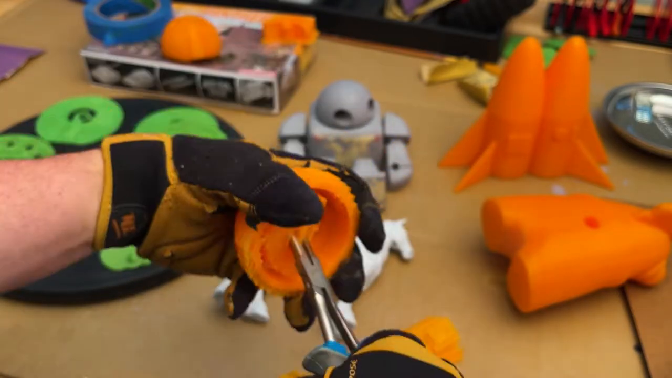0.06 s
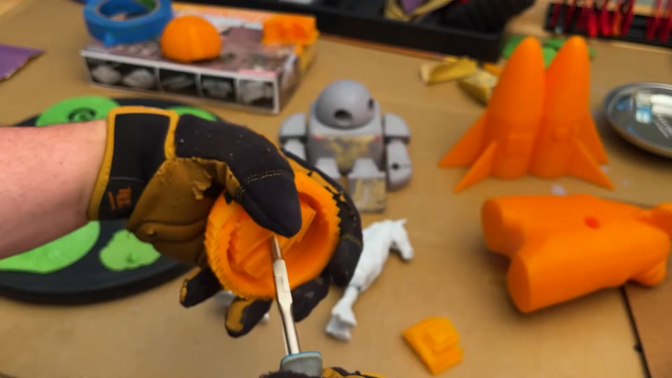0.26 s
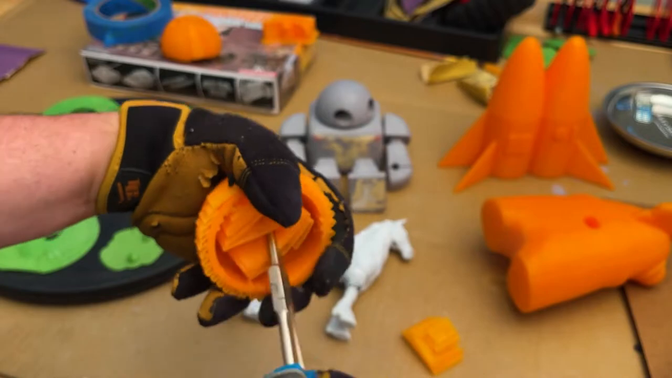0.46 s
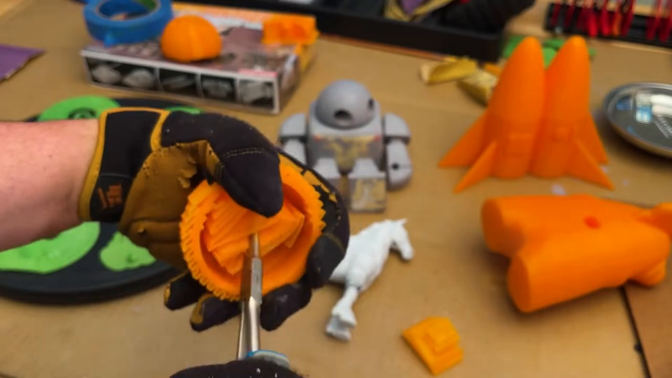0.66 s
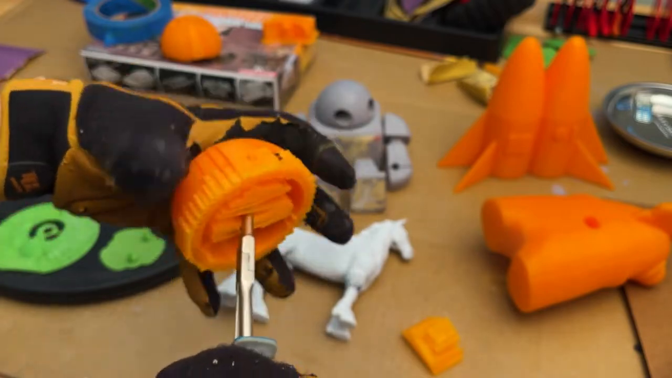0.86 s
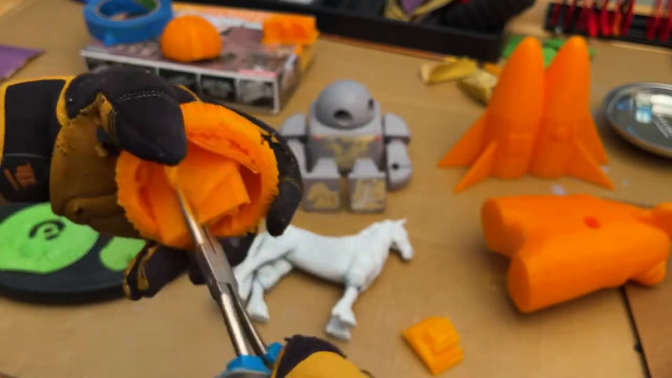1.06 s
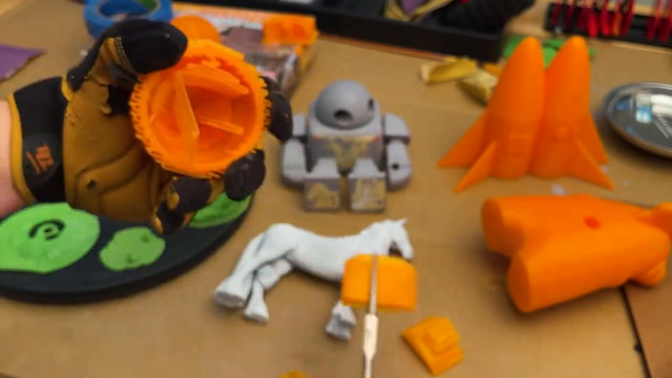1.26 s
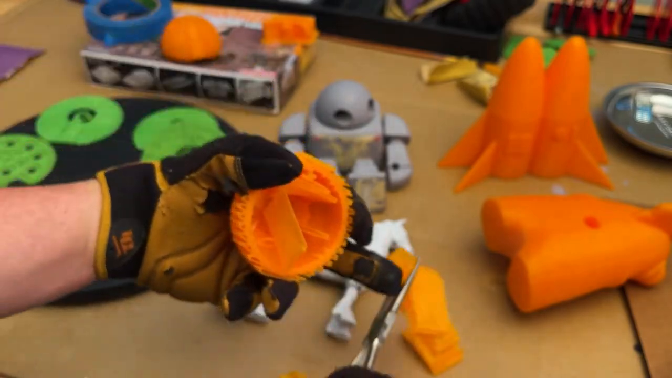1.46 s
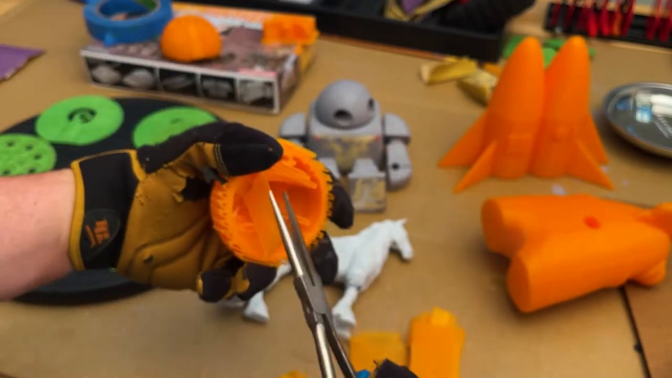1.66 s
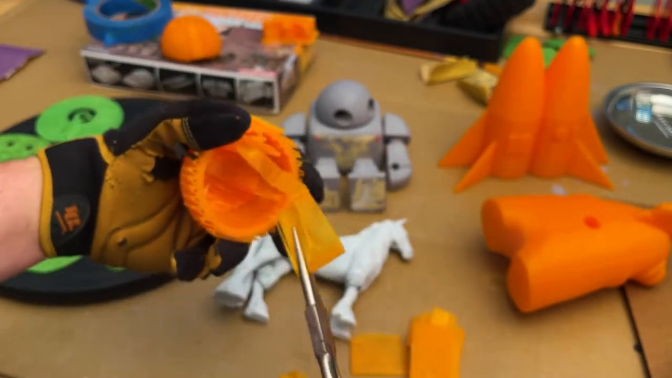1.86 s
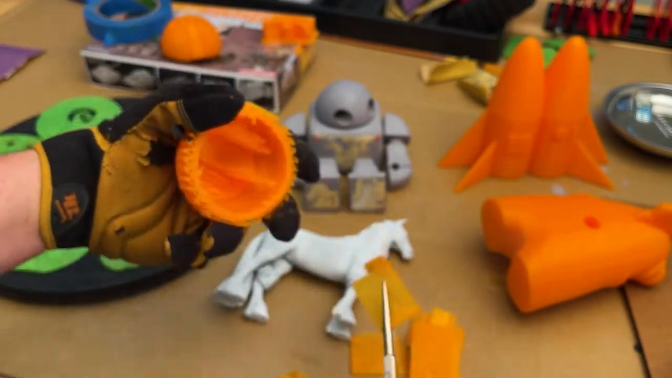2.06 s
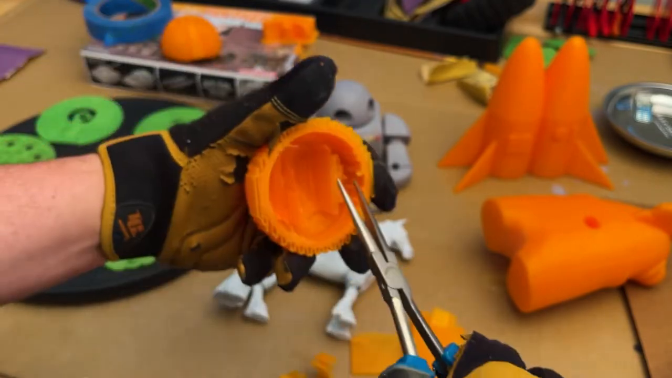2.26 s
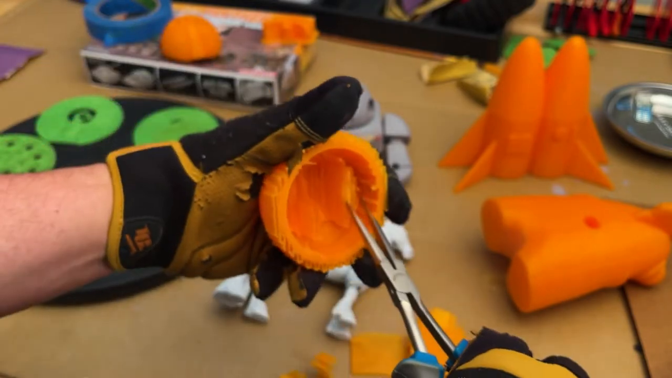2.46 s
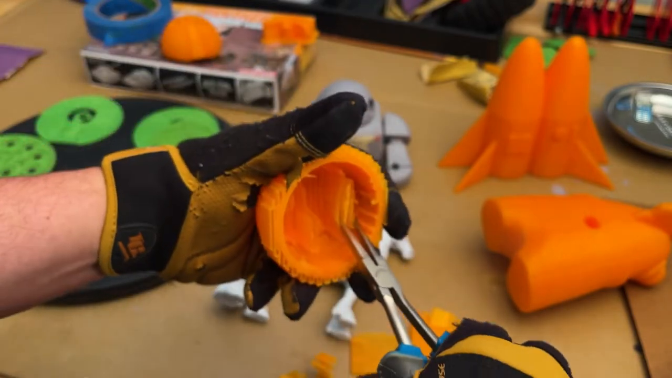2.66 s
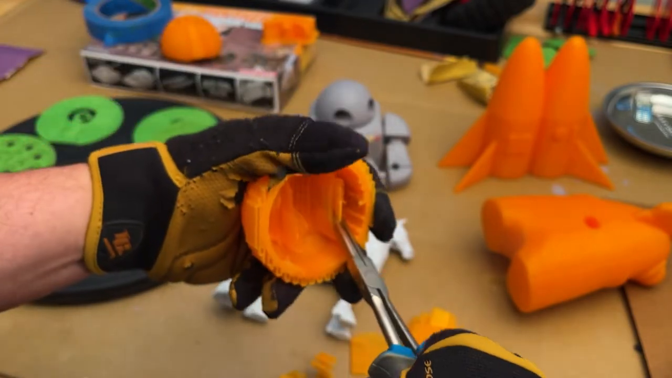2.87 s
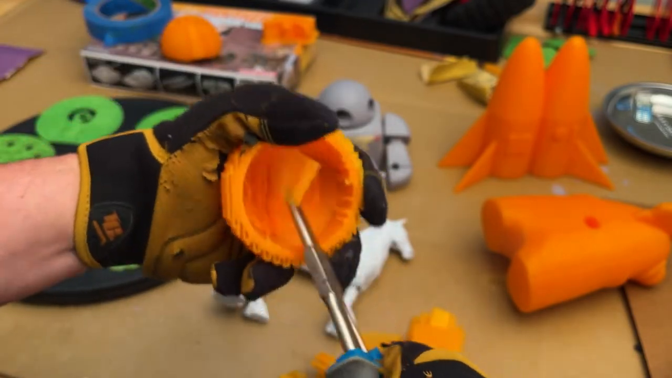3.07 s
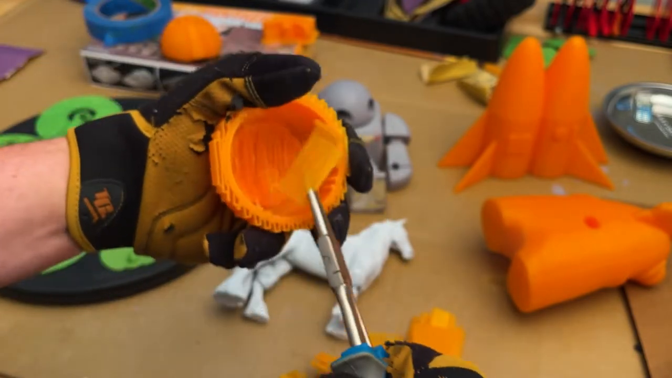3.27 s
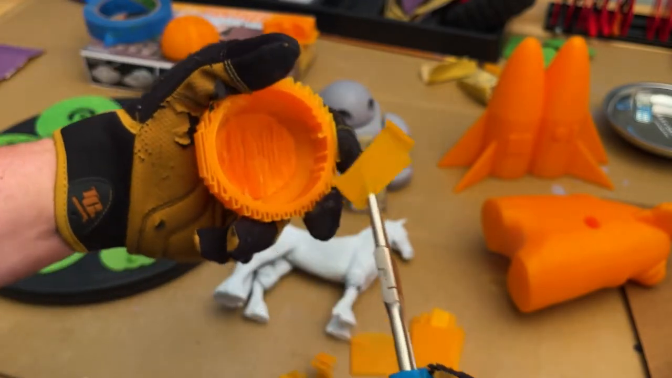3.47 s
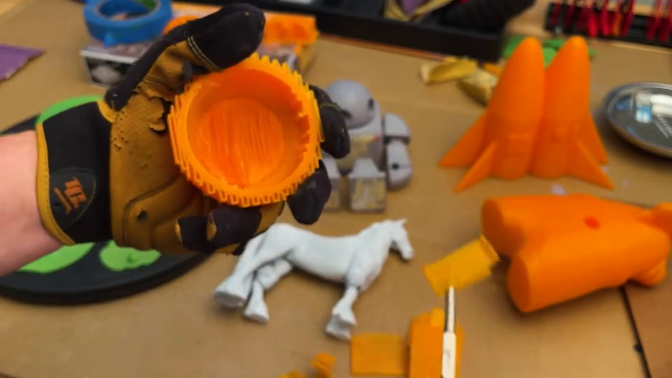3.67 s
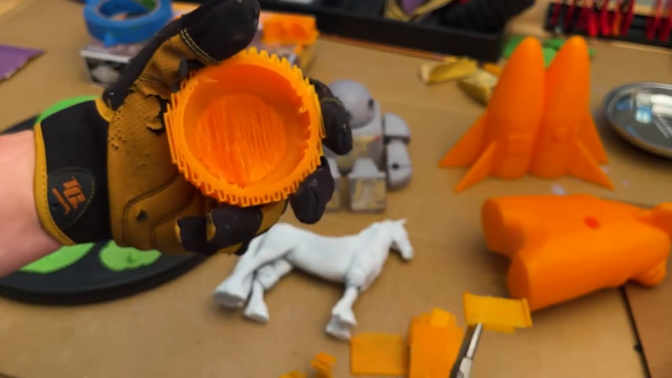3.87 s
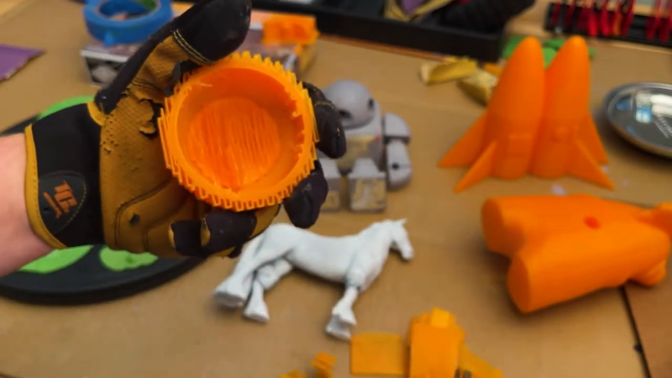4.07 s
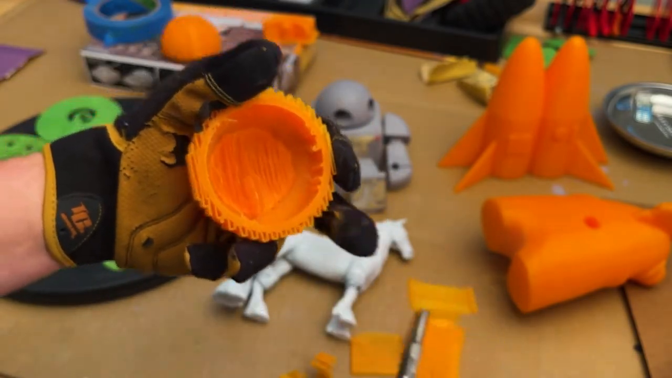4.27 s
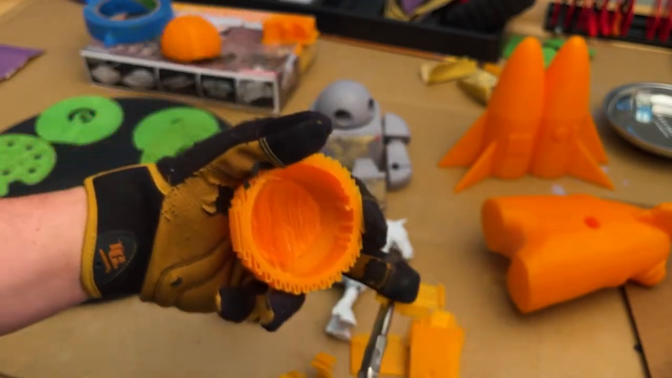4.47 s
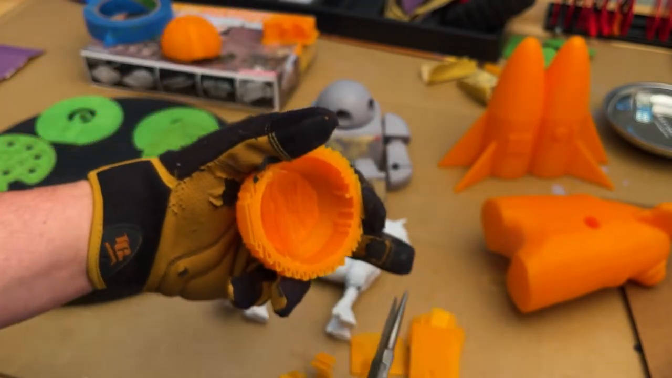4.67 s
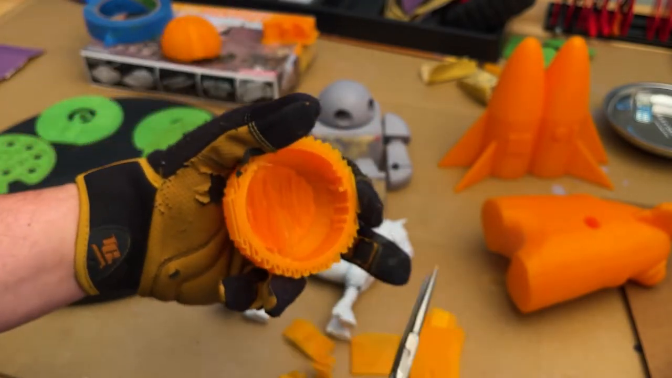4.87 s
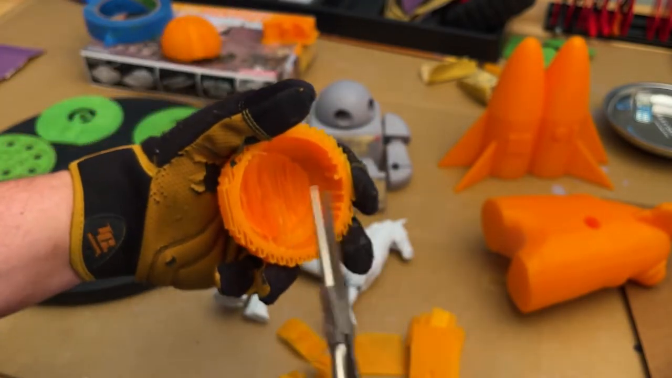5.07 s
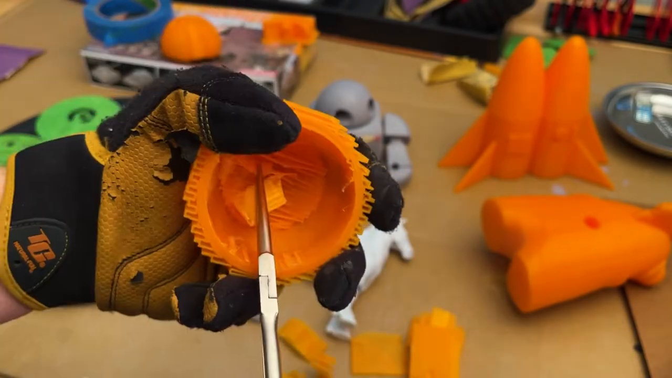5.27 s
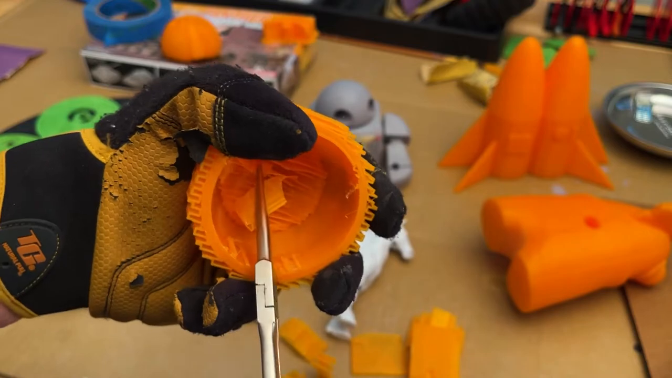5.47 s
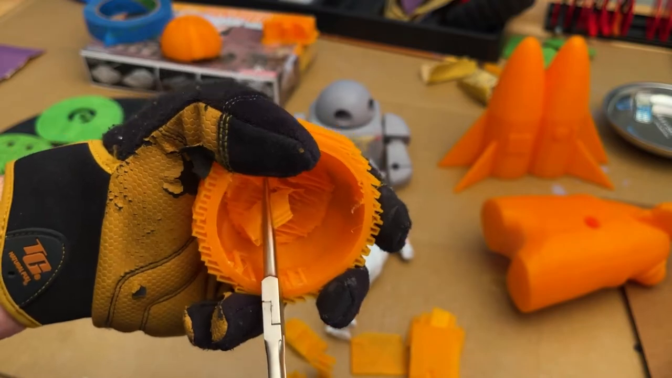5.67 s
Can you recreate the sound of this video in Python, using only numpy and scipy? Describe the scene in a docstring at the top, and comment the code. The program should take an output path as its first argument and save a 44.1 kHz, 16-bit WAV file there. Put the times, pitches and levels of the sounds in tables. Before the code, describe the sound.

A close stereo microphone in a small room catches plastic support being ripped out of a hollow printed cup with tweezers. From 0 to 1.1 s, a sped-up flurry of very short, bright, hissy snaps and tiny zipping crackles comes mostly from the left, with soft low thuds, strongest near 1.06 s; the low room noise drops away. It goes almost silent, then a scrap patters very faintly on the table around 1.5-1.7 s, and sharp ticks return at 1.8-1.95 s. At about 2.3-2.4 s soft room noise comes up and the sound turns duller, more central, ringing longer. Cracks at 2.55 and 2.72 s lead to the loudest tearing burst at 3.0-3.2 s, with a short squeaky scrape. After near-quiet, a lone click falls at 4.3 s, then lower creaking crackles at 4.7-5.1 s, a faint scrape around 5.3-5.5 s and weak final ticks.

```python
"""Plastic support lattice is torn out of a printed cup with long tweezers, close to a stereo microphone, in a small room.
Strands snap one by one as short filtered noise bursts and crackle in runs of tiny random breaks; a few send a falling thud.
Before the turn the snaps sound sped-up, bright and short; after it they are duller and ring longer. A torn-off
scrap rattles onto the table as fluttering modes. Scrapes sing in gliding sines; faint low tones and room noise
lie beneath, and the room noise drops out at times before the turn."""
import sys
import numpy as np
from scipy import signal
from scipy.fft import rfft, irfft, next_fast_len
from scipy.io import wavfile
from scipy.ndimage import uniform_filter1d, map_coordinates

SR = 44100
rng = np.random.default_rng(int(sys.argv[2]) if len(sys.argv) > 2 else 0)


def materialize(psi):
    """Save the field psi as 16-bit PCM at rate SR to the path in sys.argv[1].

    A 1-D psi becomes a single channel; in a 2-D psi each row is a channel.
    """
    bounded = np.clip(np.atleast_2d(psi).T, -1, 1)
    quanta = np.round(bounded * 32767).astype(np.int16)
    wavfile.write(sys.argv[1], SR, quanta)


N = 252625

TURN_S = 2.33  # sped-up, bright, short snaps before; duller snaps that ring longer after
AFTER_TURN = np.arange(N) >= TURN_S * SR


def snaps():
    """Each break is a burst that rises at once and dies within milliseconds; a duller rustle follows it."""
    # Strands that snap on their own, and near 1.53 to 1.64 s the sharp hits of the torn-off scrap # bouncing on
    # the table. Each row: start in seconds, relative level in dB, # low part over high part in dB, ringing in
    # Hz.
    single_breaks = [(0.0147, -38.5, -13, 9640), (0.0412, -22.5, -23, 9150), (0.0462, -29.5, -15, 7500),
                     (0.0768, -41.5, -32, 9500), (0.0911, -23, -9, 10430), (0.0983, -15, -14, 7490),
                     (0.1646, -18, -18.5, 5320), (0.1882, -30.5, -21.5, 4970), (0.2488, -13.5, -13.5, 9530),
                     (0.2543, -24.5, -22, 9350), (0.3033, -22.5, -19, 13700), (0.3221, -17.5, -13.5, 1030),
                     (0.3456, -33, -25.5, 13100), (0.3619, -27, -18.5, 5080), (0.4106, -25, -13, 11120),
                     (0.4157, -32.5, -15, 13600), (0.424, -25.5, -13.5, 10750),
                     (0.4303, -22.5, -32.5, 9500), (0.4646, -14.5, -19, 11600), (0.4701, -21.5, -6, 11150),
                     (0.475, -24.5, -44.5, 7500), (0.521, -27.5, -14.5, 11000), (0.5765, -40, -26, 12900),
                     (0.5859, -34, -12, 7560), (0.6088, -17, -20.5, 11170), (0.6441, -20.5, -22, 11650),
                     (0.664, -33.5, -23.5, 11740), (0.6726, -36, -15.5, 5580), (0.7378, -32.5, -10, 8130),
                     (0.7922, -24.5, -19, 14200), (0.9353, -24.5, -31.5, 10460), (0.9435, -23.5, -15, 3560),
                     (0.9892, -26, -15.5, 14460), (1.0049, -23, -16.5, 11880), (1.0238, -25, -22, 15070),
                     (1.0318, -17.5, -19.5, 7570), (1.0581, -15, -9, 13070), (1.078, -32, -8.5, 1033),
                     (1.2767, -41.5, -22, 13400), (1.453, -61, -22, 7800), (1.532, -44.5, 0, 3350),
                     (1.592, -50, -6, 6500), (1.612, -56, -28, 10000), (1.637, -42.5, -27, 3400),
                     (1.6637, -44, -18, 8311), (1.693, -57, -28, 8000), (1.7438, -46, -37, 10100),
                     (1.7968, -28, -19, 11283), (1.8007, -20.5, -12, 13800), (1.8075, -24.5, -10, 11360),
                     (1.8193, -29.5, -18, 11300), (1.838, -25, -16, 13600), (1.9282, -29, -34, 10895),
                     (1.9493, -23, -6, 14800), (2.048, -38.5, -15, 12700), (2.174, -38.5, -27, 13700),
                     (2.232, -43.5, -16.5, 8600), (2.3975, -44.5, 6.5, 2411), (2.453, -49.5, 16, 1030),
                     (2.545, -24, -7.5, 9560), (2.5658, -31, -6, 7960), (2.5732, -32, -1.5, 5900),
                     (2.6768, -39, 5, 1042), (2.7166, -11.5, -8, 3789), (2.758, -27.5, -2.5, 4993),
                     (2.8431, -28.5, -9, 6880), (2.8525, -35.5, -6, 4850), (2.879, -41, -4.5, 8527),
                     (2.929, -26, -3.5, 3852), (3.0096, -10.5, 2.8, 8460), (3.0276, -15, -2.5, 3408),
                     (3.0318, -13.5, -1, 8560), (3.0545, -8, -1.5, 3254), (3.0612, -17.5, -0.5, 3229),
                     (3.0658, -15.5, -10, 3049), (3.0701, -12, -2.5, 8700), (3.0745, -18.5, 7, 3805),
                     (3.085, -23.5, 4.5, 3100), (3.1082, -23, -7.5, 7037), (3.1118, -31.5, 10, 3656),
                     (3.1533, -9, -7.5, 3913), (3.157, -11, 4, 3820), (3.5315, -51.5, -3, 2730),
                     (3.6174, -50, 2, 6660), (4.315, -26.5, -8, 7220), (4.5787, -41, 0, 6600),
                     (4.6938, -25.5, 0, 2450), (4.6975, -38.5, 6, 6700), (4.7425, -41, -0.5, 5080),
                     (4.7775, -33.5, 3, 2770), (4.785, -40, 10, 2900), (4.8092, -28, 8, 4000),
                     (4.8608, -21.5, 10.5, 4000), (4.8748, -37.5, 14.5, 4430), (4.882, -32, 8, 3200),
                     (4.891, -31, 12, 4200), (4.9043, -34, -1, 5700), (4.918, -37.5, 12, 3900),
                     (4.9437, -37.5, 15, 4280), (5.347, -47, -10, 3840), (5.5111, -50.5, 3, 5900),
                     (5.543, -36, -14.5, 5360), (5.572, -53, -3, 2760), (5.6753, -41, -2, 7400)]
    early_t60_s, late_t60_s = 0.005, 0.011  # before and after the turn
    crack_db = 10  # the first instant of a break over its level
    levels = np.zeros((2, N + SR))
    cracks = np.zeros((2, N))
    ring_hz = np.ones(N)
    t = np.arange(SR // 8) / SR
    rise = 1 - np.exp(-t / .0004)
    for s, db, low_db, hz in sorted(list(single_breaks) + ripped()):
        start = round(s * SR)
        t60_s = early_t60_s if s < TURN_S else late_t60_s
        burst = parts(low_db) * amp(db + 3.0 - 60 * t / t60_s)
        rustle = parts(low_db + 8.5) * amp(db - 24.0 - 60 * t / 0.1)  # duller than the break
        levels[:, start:][:, :len(t)] += (burst + rustle) * rise
        cracks[:, start + 8] += parts(low_db)[:, 0] * amp(db + crack_db)
        ring_hz[start:] = hz
    return ringing(plastic(levels[:, :N], cracks), ring_hz, lift_db=10.5)


def ripped():
    """Rows of strands let go one after another: near-even gaps and a random colour for each break."""
    # Each row: first break in seconds, last break in seconds, gap in seconds, relative level in dB,
    # low part over high part in dB, ringing in Hz.
    strand_rows = [(0.436, 0.4494, 0.0023, -28.5, -19, 10210), (0.6135, 0.63, 0.0023, -24.5, -23.5, 14000),
                   (0.7092, 0.721, 0.0037, -23.5, -22, 15080), (0.7487, 0.7493, 0.003, -33.5, -18.5, 10490),
                   (2.718, 2.742, 0.0073, -24.5, -13, 4852)]
    gap_scatter, colour_scatter_db = 0.063, 2.5  # the first as a share of the gap
    breaks = []
    for first, last, gap, db, low_db, hz in strand_rows:
        for s in np.arange(first, last + gap / 2, gap):
            shift_s = gap_scatter * gap * rng.standard_normal()
            colour_db = colour_scatter_db * rng.standard_normal()
            breaks.append((s + shift_s, db, low_db + colour_db, hz))
    return breaks


def crackle():
    """Tiny breaks at random moments and of random strength, over a rubbing hiss; the scrapes have the hiss alone."""
    # Runs of fine tearing and rubbing. Each row: start in seconds, end in seconds, first relative level in dB,
    # last relative level in dB, low part over high part in dB, ringing in Hz.
    tearing_runs = [(0, 0.09, -59.5, -63, 1, 4300), (0.634, 0.678, -26.5, -51.5, -10.5, 12100),
                    (0.714, 0.76, -44, -48, -6, 14200), (0.928, 0.96, -45.5, -46, -11.5, 13250),
                    (1.248, 1.327, -71.5, -59.5, -46, 14040), (1.462, 1.549, -54, -51, -22.5, 12320),
                    (1.545, 1.736, -55, -68, -16, 13200), (1.746, 1.803, -54.5, -60.5, -11, 14200),
                    (1.923, 1.991, -31.5, -43.5, -11, 11600), (1.996, 2.147, -54, -62.5, -10.5, 11400),
                    (2.173, 2.219, -44.5, -80, -12.5, 11900), (2.434, 2.518, -63, -59.5, 15.5, 998),
                    (2.505, 2.578, -47, -34, 5.5, 5300), (2.678, 2.707, -49, -45.5, 10, 1940),
                    (2.73, 2.793, -36.5, -40, -6.5, 5160), (2.901, 2.94, -44, -38, -2.5, 8570),
                    (2.993, 3.009, -47.5, -37.5, -5, 8390), (3.012, 3.052, -24, -26, 6.5, 3490),
                    (3.062, 3.097, -28.5, -28.5, 4, 3490), (3.15, 3.205, -16, -46.5, 1.5, 3750),
                    (3.534, 3.75, -67.5, -67, -2.5, 4960), (4.876, 4.973, -39, -49.5, 11.5, 4100),
                    (4.973, 5.133, -55, -73, 13, 2750)]
    # Smooth scrapes of the jaws. Each row: start in seconds, end in seconds, first relative level in dB,
    # last relative level in dB, low part over high part in dB, ringing in Hz.
    jaw_scrapes = [(1.076, 1.167, -33.5, -60.5, -11.5, 14130), (3.1, 3.152, -25, -24, -6, 5750),
                   (4.501, 4.539, -59.5, -45.5, 5, 3130), (4.536, 4.614, -48, -54, 0, 4300),
                   (4.695, 4.857, -46, -51.5, 7, 2400), (5.285, 5.503, -57.5, -72, 6.5, 5760),
                   (5.693, 5.727, -40, -55, 5, 1195)]
    breaks_per_s, rub = 550, 0.31  # rub: steady hiss under the tiny breaks
    spikes = (rng.random(N) < breaks_per_s / SR) * amp(rng.normal(0, 3.5, N))
    # the tiny breaks die faster before the turn (t60 in seconds)
    short, long = (unit(signal.lfilter([1], [1, -amp(-60 / (t60 * SR))], spikes)) for t60 in (.004, .009))
    grains = np.where(AFTER_TURN, long, short) + rub
    levels, ring_hz = np.zeros((2, 2, N)), np.ones(N)
    for smooth, rows in enumerate((tearing_runs, jaw_scrapes)):
        for start, end, first_db, last_db, low_db, hz in rows:
            a, b = round(start * SR), round(end * SR)
            levels[smooth, :, a:b] += parts(low_db) * amp(np.linspace(first_db, last_db, b - a))
            ring_hz[a:b + SR // 50] = hz
    tearing, rubbing = uniform_filter1d(levels, size=260, axis=2)  # soft edges
    return amp(-3.5) * ringing(plastic(tearing * unit(grains) + rubbing), ring_hz, lift_db=6.5)


def plastic(levels, cracks=0):
    """Noise under a low and a high envelope plus single cracks takes the plastic's colour; two ports, mostly alike."""
    # Bright colour of a break before the turn. Each row: frequency in Hz, relative gain in dB.
    early_colour = [(350, -48.5), (800, -27.5), (2750, -21.5), (4160, -18.5), (7590, -9.5), (10000, -6.5),
                    (13500, -3.5), (15800, 0.5), (16100, -18.5)]
    split_hz = 6200  # between the low and the high part
    early_gain = lambda hz: amp(along(early_colour, hz))
    noise = unit(rng.standard_normal(N) + .3 * rng.standard_normal((2, N)))
    out = np.zeros((2, N))
    for gain, on in ((early_gain, ~AFTER_TURN), (cup_gain, AFTER_TURN)):
        for side, level, crack in zip((1, -1), levels, np.broadcast_to(cracks, levels.shape)):
            # side 1 keeps the lows, side -1 the highs
            half = lambda hz: causal(gain(hz) / np.sqrt(1 + ((hz + 1) / split_hz) ** (16 * side)))
            out += filtered((noise * level + crack) * on, half)
    return out


def cup_gain(hz):
    """The cup colours a break, and resonances of its wall stand out on top."""
    # Colour of a break after the turn. Each row: frequency in Hz, relative gain in dB.
    cup_colour = [(150, -45), (320, -26.5), (800, -26), (1500, -19.5), (2650, -16.5), (3100, -11),
                  (4700, -8), (7000, -8), (8600, -2), (10200, -8), (11200, -2), (12400, -17),
                  (13600, -48.5)]
    # Resonances of the cup wall. Each row: frequency in Hz, width in Hz, lift in dB.
    wall_modes = [(1587, 15, 11), (3240, 380, 5), (3670, 430, 3.5)]
    modes = sum((amp(db) - 1) / (1 + (2 * (hz - c) / w) ** 2) for c, w, db in wall_modes)
    return amp(along(cup_colour, hz)) * (1 + modes)


def parts(low_db):
    """Shares of the low and the high part, energy 1 together."""
    return np.array([[amp(low_db)], [1]]) / np.hypot(amp(low_db), 1)


def ringing(x, ring_hz, lift_db):
    """The piece in the jaws rings along: a resonance whose pitch is given per sample."""
    hz, t, z = signal.stft(x, SR, nperseg=128)
    centre = ring_hz[np.minimum(t * SR + 64, N - 1).astype(int)]
    half_width = 0.045 * centre
    ring = 1 + amp(lift_db) / (1 + ((hz[:, None] - centre) / half_width) ** 2)
    return signal.istft(z * ring, SR, nperseg=128)[1][:, :N]


def shifting(x, depth_db):
    """The colour of the noise drifts at random."""
    z = signal.stft(x, nperseg=128)[2]
    field = rng.standard_normal(z.shape[1:])
    field = uniform_filter1d(field, size=3, axis=0)  # across frequency
    field = uniform_filter1d(field, size=9, axis=1)  # across time
    return signal.istft(z * amp(depth_db * unit(field)), nperseg=128)[1][:, :N]


def scrap():
    """Every bounce on the table rings the scrap's modes anew; each ring flutters at random."""
    # Bounces of the torn-off scrap. Each row: start in seconds, relative level in dB.
    bounces = [(1.503, -63), (1.532, -51), (1.571, -57), (1.596, -60), (1.639, -58)]
    # Modes of the scrap. Each row: frequency in Hz, relative level in dB, t60 in seconds.
    scrap_modes = [(1140, -16, 0.13), (1706, -11, 0.084), (3100, -8, 0.039), (3560, -11, 0.089),
                   (4820, -8.5, 0.039), (5900, -6.5, .025)]
    out, t = np.zeros(N), np.arange(SR // 8) / SR
    rise = 1 - np.exp(-t / .001)
    for s, db in bounces:
        for hz, level, t60 in scrap_modes:
            flutter = 1 + 1.3 * wobble(len(t), size=90)
            fade = amp(db + level + rng.normal(0, 3) - 60 * t / t60) * rise
            out[round(s * SR):][:len(t)] += fade * flutter * np.sin(2 * np.pi * hz * t)
    return out


def thuds():
    """One push each, spread out so that the highs arrive first and the lows trail by about 1.5 cycles."""
    # Thuds under some breaks. Each row: start in seconds, relative level in dB, upper corner in Hz.
    pushes = [(0.093, -49.5, 1230), (0.248, -39, 1380), (0.322, -33, 1110), (0.468, -48, 1690),
              (0.4739, -48, 1180), (1.0589, -32, 1980), (1.062, -24, 1260), (1.0763, -20.5, 983),
              (2.397, -56.5, 1440), (2.569, -44, 813), (3.011, -41.5, 1170), (3.068, -38, 662),
              (4.3151, -60.5, 1497), (4.695, -50, 1200)]
    click = np.arange(N) == 0
    out = np.zeros(N)
    for s, db, top_hz in pushes:
        shape = lambda hz: 1 / (1 + (170 / (hz + 1)) ** 4) / (1 + (hz / top_hz) ** 4)
        glide = lambda hz: np.exp(-2j * np.pi * (1.5 * np.log(1 + hz / 40) + hz * s))  # also moves it to s
        out += amp(db + 38.5) * filtered(click, lambda hz: shape(hz) * glide(hz))
    return out


def tones(rows, flutter, size):
    """Sines that glide a little, flutter, and fade in and out."""
    out = np.zeros(N)
    for start, end, first_hz, last_hz, db in rows:
        a, b = round(start * SR), round(end * SR)
        fade = signal.windows.tukey(b - a, .5)
        swell = amp(db) * fade * (1 + flutter * wobble(SR, size)[:b - a])
        out[a:b] += swell * np.sin(2 * np.pi * np.cumsum(np.linspace(first_hz, last_hz, b - a)) / SR)
    return out


def right_port(x):
    """A little farther from the work; after the turn farther still, and weaker around the cup's main ring."""
    lag = lambda hz, s: np.exp(-2j * np.pi * hz * s)
    shade = lambda hz: amp(-5.5 / (1 + ((hz - 3600) / 1900) ** 2))
    early = filtered(x * ~AFTER_TURN, lambda hz: lag(hz, 1.1e-5))
    late = filtered(x * AFTER_TURN, lambda hz: lag(hz, 2.6e-5) * shade(hz))
    return early + late


def walls(x):
    """Each frequency of the room's answer dies at its own speed; a new tail every third of a second."""
    # Decay of the small room. Each row: frequency in Hz, t60 in seconds.
    room_decay = [(500, 0.23), (1000, 0.54), (1550, 0.86), (2500, 0.6), (9000, 0.46), (15000, 0.053)]
    out, step = np.zeros((2, N + SR)), SR // 3
    for start in range(0, N, step):
        hz, t, z = signal.stft(rng.standard_normal((2, SR // 2)), SR, nperseg=256)
        decay = amp(-60 * t / along(room_decay, hz)[:, None])
        tail = signal.istft(z * decay, SR, nperseg=256)[1]
        answer = signal.fftconvolve(x[None, start:start + step], tail / np.linalg.norm(tail[0]), axes=1)
        out[:, start + 130:][:, :answer.shape[1]] += answer  # 3 ms after the work
    return out[:, :N]


def air():
    """Room noise: rumble near mono, hum half alike, hiss almost unrelated between the ports; its level wavers."""
    # Low room noise over time. Each row: time in seconds, rumble level in dB, hum level in dB.
    low_levels = [(0, -61.5, -62.5), (0.122, -66.5, -68), (.45, -78, -71.5), (.5, -101, -105),
                  (.659, -101, -102), (.72, -100, -75.5), (1.051, -92.5, -67), (1.129, -105, -105),
                  (1.682, -117, -108), (1.731, -105, -88), (1.918, -107, -56), (2.2, -84.5, -76),
                  (2.42, -66.5, -68.5), (5.278, -65.5, -70), (5.31, -70.5, -76.5), (5.73, -71, -69)]
    # Room hiss over time. Each row: time in seconds, level in dB.
    hiss_level = [(2.385, -82), (2.395, -66.5), (3.7, -73.5), (3.8, -78), (3.96, -72.5), (5.0, -73.5),
                  (5.2, -79), (5.3, -69.5)]
    # Colours of the three layers. Each row: frequency in Hz, relative gain in dB.
    rumble_colour = [(18, -46), (30, -10), (60, 0.5), (130, -4.5), (300, -82.5)]
    hum_colour = [(90, -50), (160, 4), (300, 1), (330, -3.5), (700, -12), (1060, -11), (1140, -5),
                  (1220, -12), (2500, -89)]
    hiss_colour = [(500, -33.5), (1600, -3), (4000, -5.5), (10000, -8), (11300, -23), (12000, -71.5)]
    rumble_db, hum_db = curves(low_levels)
    hiss_db, = curves(hiss_level)
    layers = ((rumble_db, rumble_colour, .2), (hum_db, hum_colour, .7), (hiss_db, hiss_colour, 5))
    out = np.zeros((2, N))
    for db, colour, unlike in layers:
        noise = rng.standard_normal(N) + unlike * rng.standard_normal((2, N))
        out += amp(db) * unit(filtered(noise, lambda hz: amp(along(colour, hz))))
    sway = map_coordinates(rng.standard_normal(SR), [np.arange(N) * 7 / SR])  # 7 random points a second
    return out * amp(1.9 * sway)


def amp(db):
    """Decibels to a factor."""
    return 10 ** (np.asarray(db) / 20)


def unit(x):
    """x at an rms of 1."""
    return x / np.sqrt(np.mean(x ** 2) + 1e-20)


def wobble(length, size):
    """Noise smoothed twice over size samples, at an rms of 1."""
    luck = rng.standard_normal(length)
    return unit(uniform_filter1d(uniform_filter1d(luck, size=size), size=size))


def along(points, hz):
    """Rows of frequency in Hz and value, read on a log frequency axis."""
    f, v = np.transpose(points)
    return np.interp(np.log(hz + 1), np.log(f + 1), v)


def curves(rows):
    """One value per sample for each column after the time."""
    s, *cols = np.transpose(rows)
    return [np.interp(np.arange(N) / SR, s, c) for c in cols]


def filtered(x, response):
    """x times a complex response of frequency."""
    m = 2 * next_fast_len(N // 2 + SR // 4)
    return irfft(rfft(x, m) * response(np.fft.rfftfreq(m, 1 / SR)), m)[..., :N]


def causal(gain):
    """The minimum-phase response of this gain: it starts at the blow, with energy 1."""
    c = irfft(np.log(gain + 1e-6))
    c[1:len(c) // 2] *= 2
    c[len(c) // 2 + 1:] = 0
    return np.exp(rfft(c)) / np.sqrt(np.mean(gain ** 2))


def scene():
    """The tearing is placed between the ports and answered by the room; thuds, low tones and room noise join it."""
    # Bands that sing and slide while the jaws scrape. Each row: start in seconds, end in seconds,
    # first frequency in Hz, last frequency in Hz, relative level in dB.
    singing = [(3.11, 3.13, 3930, 3400, -29.5), (3.121, 3.151, 5550, 5330, -32.5),
               (3.126, 3.151, 8570, 7860, -29), (5.29, 5.46, 1562, 980, -76.5),
               (5.335, 5.39, 3800, 3770, -71)]
    # Faint low tones. Each row: start in seconds, end in seconds, first frequency in Hz,
    # last frequency in Hz, level in dB.
    low_tones = [(0.02, 0.54, 340.6, 365, -63.5), (0.1, 0.56, 219.2, 224, -64),
                 (0.68, 0.888, 322, 286, -63), (5.322, 5.367, 413, 411, -69)]
    # Where the work sits. Each row: time in seconds, left over right in dB ahead of the right port's shade.
    place = [(0, 4.5), (1.05, 8.5), (1.3, 8), (1.8, 5), (2.4, 1.5), (4.82, 0.5), (4.86, 3), (5.3, 1.5)]
    # Where the thuds sit: left over right in dB, before and after the turn.
    thud_place = [-3, 5]
    work = shifting(snaps() + crackle(), depth_db=3) + scrap() + tones(singing, flutter=2, size=110)
    room = walls(work.mean(0) * amp(np.where(AFTER_TURN, -19, -21)))
    pan_db, = curves(place)
    left, right = work * amp([pan_db / 2, -pan_db / 2])
    direct = np.array([left, right_port(right)])
    thud_pan_db = np.where(AFTER_TURN, thud_place[1], thud_place[0])
    knocks = thuds() * amp([thud_pan_db / 2, -thud_pan_db / 2])
    return direct + room + knocks + tones(low_tones, flutter=0.24, size=900) + air()


def record(dry):
    """The loudest breaks are squeezed below full scale; a steep low-pass closes the top."""
    top_hz = 16600
    held = dry / (1 + np.abs(dry / .9) ** 4) ** .25
    return filtered(held, lambda hz: 1 / (1 + (hz / top_hz) ** 120))


dry = scene()
out = record(dry)
materialize(out)
```